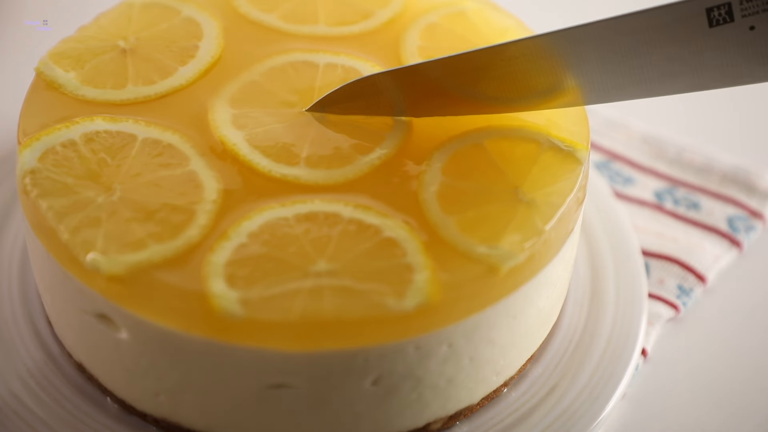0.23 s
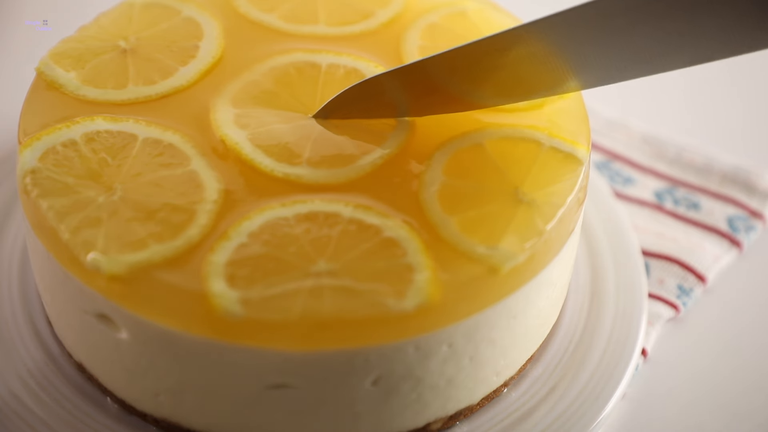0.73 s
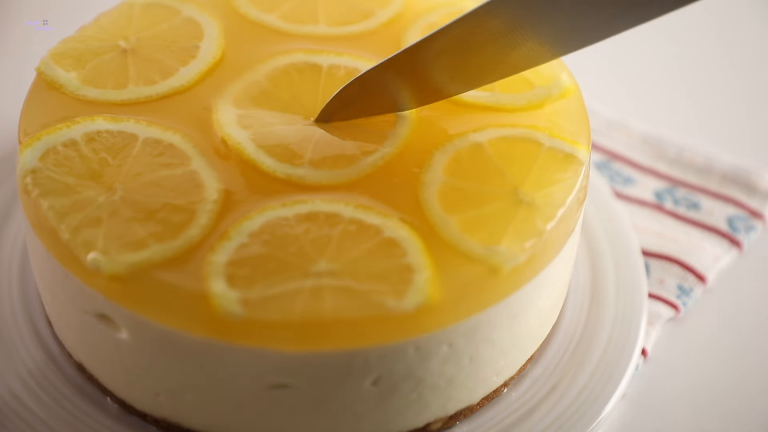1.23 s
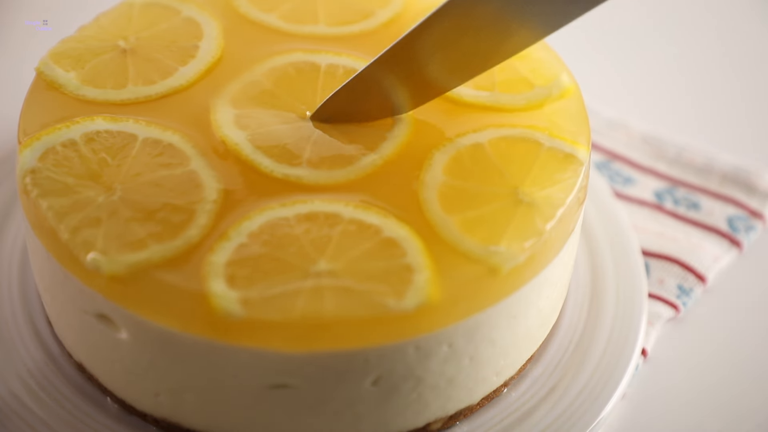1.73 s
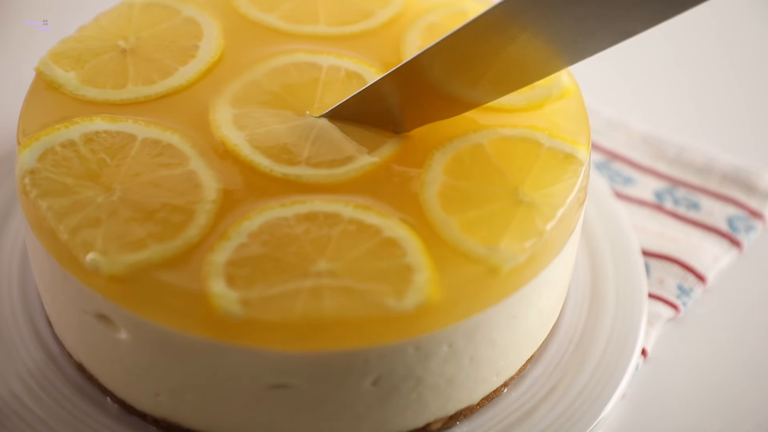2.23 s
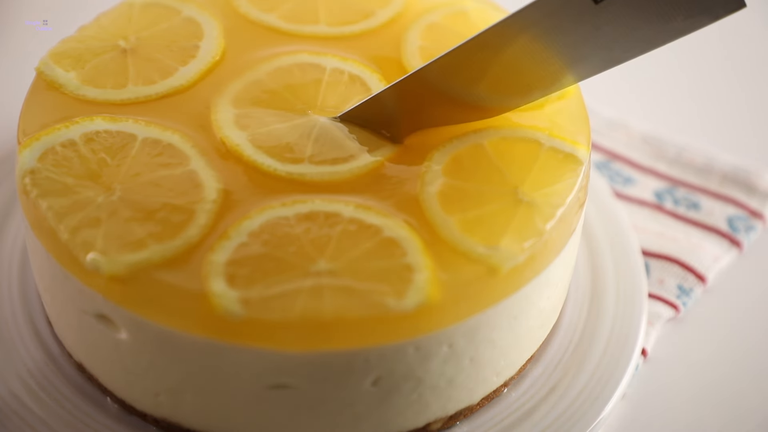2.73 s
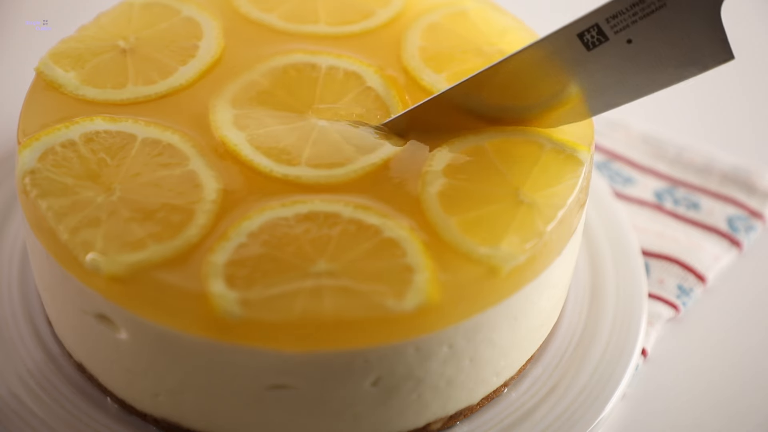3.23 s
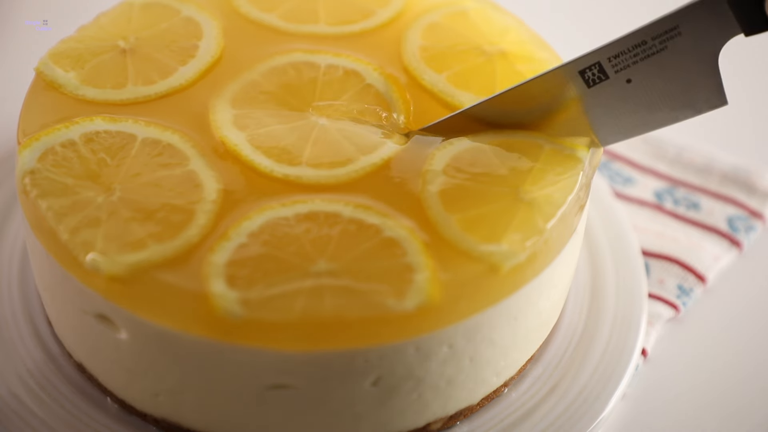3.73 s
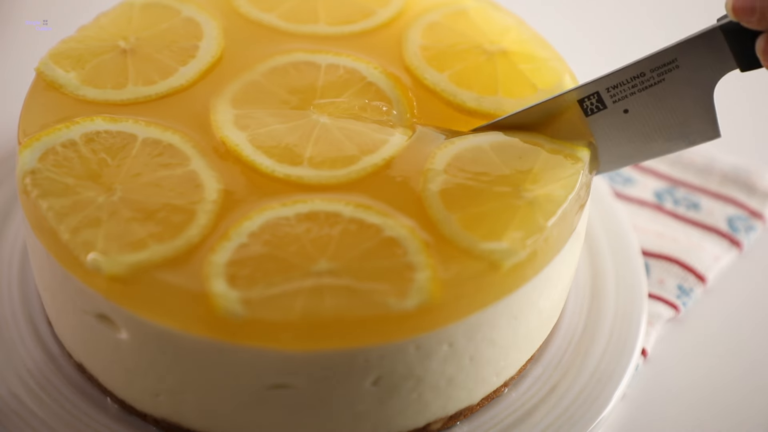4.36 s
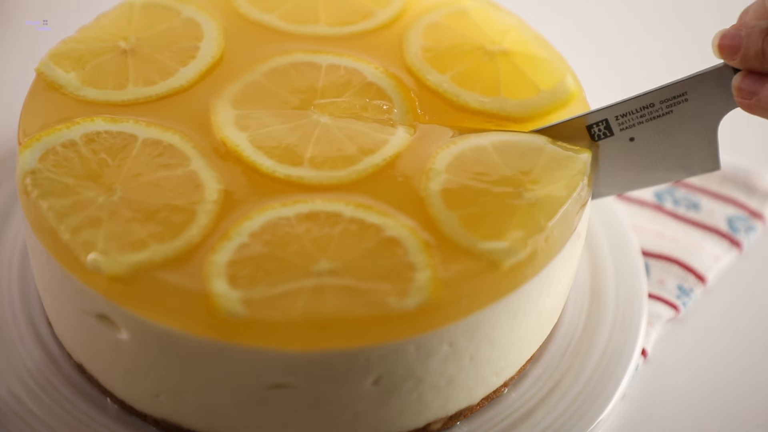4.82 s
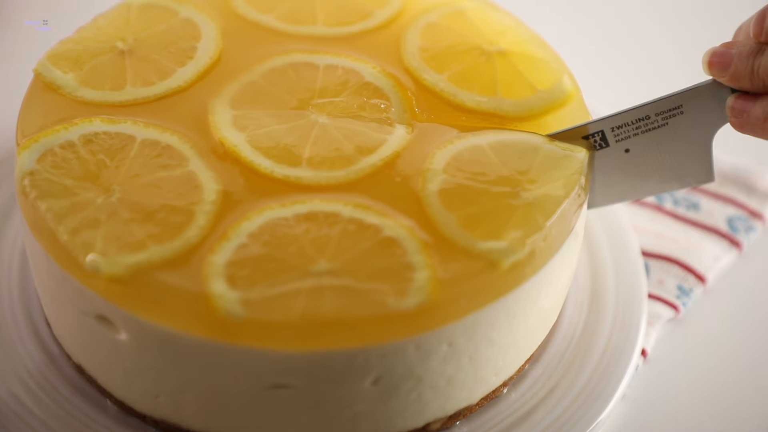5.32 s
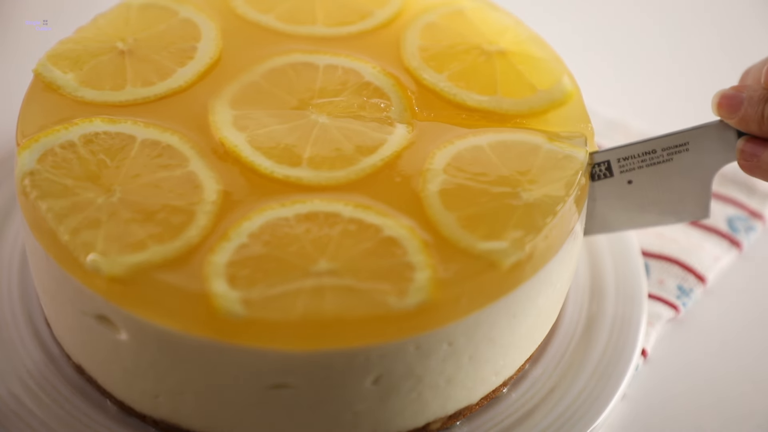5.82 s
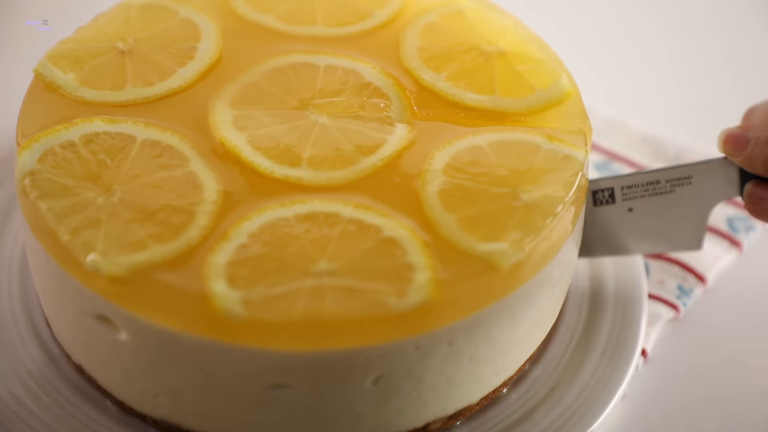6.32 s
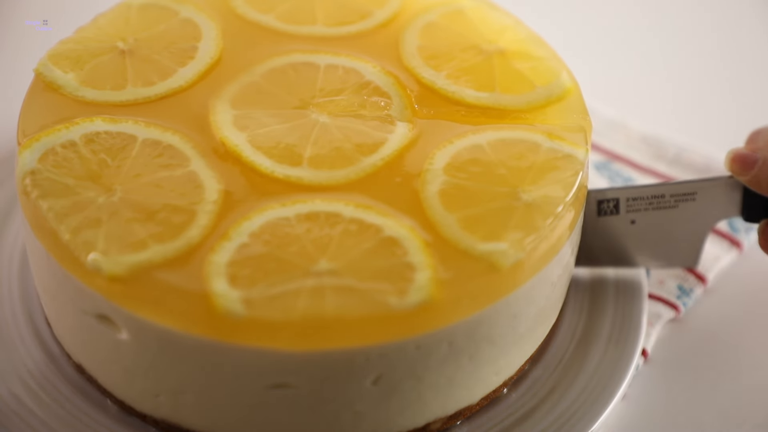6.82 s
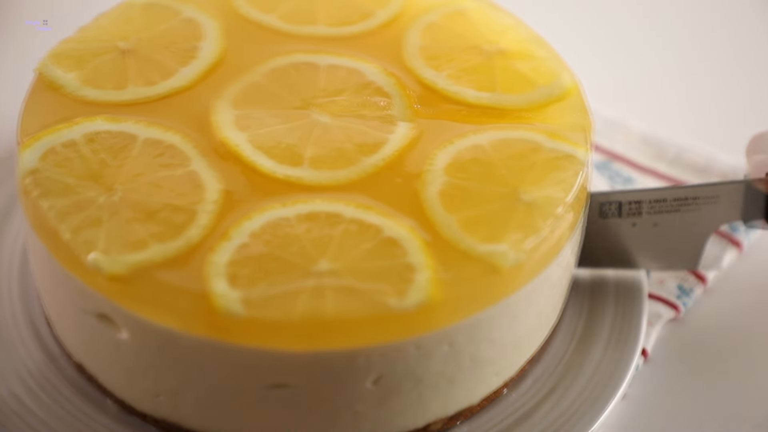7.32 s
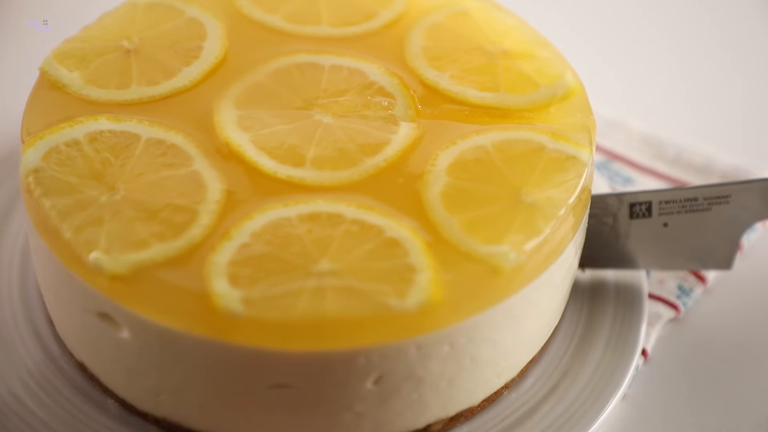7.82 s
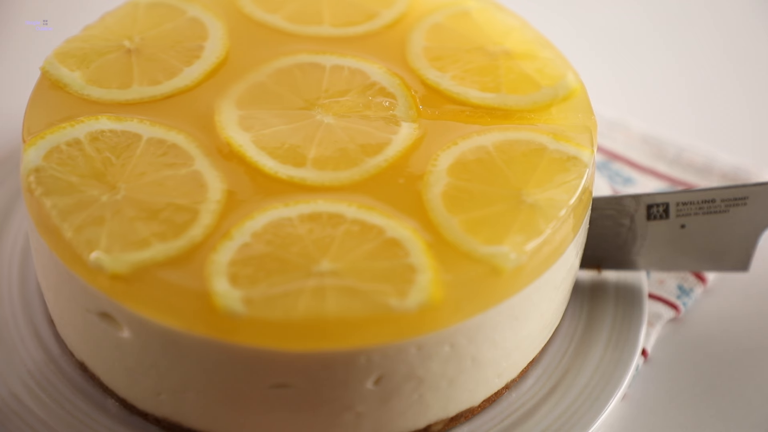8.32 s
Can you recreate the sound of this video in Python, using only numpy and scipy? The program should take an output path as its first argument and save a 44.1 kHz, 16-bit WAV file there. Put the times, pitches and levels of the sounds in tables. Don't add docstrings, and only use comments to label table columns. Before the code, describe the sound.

A cake is cut slowly, heard from close by in a small room. At first there is only hiss, faint rumble and isolated ticks; three quick fibrous tears follow, then another, each with a dull thud. Light jelly pops lead to crisp biscuit crunching that builds to a hard, very loud crack on the plate. Steel scrapes stutter over glaze, a hum dies, and filling peels softly away.

```python
import sys
import numpy as np
from scipy import signal
from scipy.fft import rfft, irfft, next_fast_len
from scipy.io import wavfile

SR = 44100
rng = np.random.default_rng(int(sys.argv[2]) if len(sys.argv) > 2 else 0)


def invert_db(x):
    u = np.asarray(x, float) / 20
    return 10 ** u


def int16_out(signal):
    q = np.round(np.clip(np.atleast_2d(signal).T, -1, 1) * 32767)
    wavfile.write(sys.argv[1], SR, q.astype(np.int16))


N = 378378


def unit(x):
    return x / np.sqrt(np.mean(x ** 2) + 1e-20)


def along(points, hz):
    f, v = np.transpose(points)
    return np.interp(np.log(hz + 1), np.log(f + 1), v)


def curves(rows):
    s, *cols = np.transpose(rows)
    t = np.arange(N) / SR
    gate = np.clip(np.minimum(t - s[0], s[-1] - t) * 20, 0, 1)
    return [np.interp(t, s, c) for c in cols] + [gate]


def swells(rows):
    t = np.arange(N) / SR
    total = 0
    for s, length, *db in rows:
        bump = np.cos(np.pi * np.clip((t - s) / length, -.5, .5)) ** 2
        total = total + invert_db(db)[:, None] * bump
    return total


def held(db, hold_s):
    keep = np.exp(-1 / (hold_s * SR))
    return np.sqrt(signal.lfilter([1 - keep], [1, -keep], invert_db(2 * db)))


def wobble(rate):
    knots = rng.standard_normal(int(N * rate / SR) + 2)
    return np.interp(np.arange(N) * rate / SR, np.arange(len(knots)), knots)


def filtered(x, response):
    m = next_fast_len(N + SR // 2)
    return irfft(rfft(x, m) * response(np.fft.rfftfreq(m, 1 / SR)), m)[:N]


def body(modes):
    def response(f):
        total = 0
        for k, (c, w, db) in enumerate(modes):
            total = total + (-1) ** k * invert_db(db) * 1j * f * w / (c * c - f * f + 1j * f * w)
        return total
    return response


def noise(spectrum):
    return unit(filtered(rng.standard_normal(N), lambda hz: invert_db(along(spectrum, hz))))


def grains(s, hz, size, cycles):
    k = np.arange(64)
    turns = np.clip(hz, 500, .3 * SR)[:, None] * k / SR
    life = turns / np.clip(cycles, .2, 3)[:, None]
    waves = size[:, None] * (life * np.exp(1 - life)) ** 2 * np.cos(2 * np.pi * turns)
    at = np.round(s * SR).astype(int)[:, None] + k
    return np.bincount(at.ravel(), waves.ravel(), N + SR)[:N]


def crumbs(count, spread_db):
    draw = rng.random((count, 3))
    size = invert_db(-spread_db * np.log(draw[:, 1] + 0.00058)) * np.sign(draw[:, 2] - .5)
    return unit(np.bincount((draw[:, 0] * N).astype(int), size, N))


# centre in Hz, width in Hz, level in dB
DISH = [(338, 170, -1.5), (538.7, 263, 1.5), (697, 172, 2.5), (1430, 1300, -16.5)]


def knocks(s, db, modes=DISH):
    return filtered(np.bincount(np.round(s * SR).astype(int), invert_db(db), N), body(modes))


def breaks(rows):
    s, db, hz, knock, edge = np.transpose(rows)
    cycles = np.full(len(s), 0.78)
    clicks = grains(s, hz, invert_db(db + 0.5), 0.89 * cycles)
    edges = grains(s, np.full(len(s), 8370), invert_db(db + edge + 14.5), 1.24 * cycles)
    return clicks + edges + knocks(s, db + knock + 38.5)


def clumps(rows, edge_db, count=12):
    s, db, hz, knock, ms = (c[:, None] for c in np.transpose(rows))
    blur_db = -1.5 * ms
    draw = rng.standard_normal((len(s), count, 3))
    lesser = np.arange(count) > 0
    when = s - 1 / hz + lesser * ms / 1000 * .36 * draw[..., 0]
    pitch = hz * np.exp(0.3654 * lesser * draw[..., 1])
    small = 0.858 * np.tanh(invert_db(-10) * np.sqrt(np.abs(ms)) * draw[..., 2])
    size = invert_db(db - 2.5) * np.where(lesser, small, invert_db(1.0 + .5 * blur_db))
    clicks = grains(when.ravel(), pitch.ravel(), size.ravel(), np.full(when.size, 0.96))
    edge_size = invert_db(db + edge_db + 2 * blur_db + 0.5).ravel()
    edge = grains(s.ravel(), np.full(len(s), 9150), edge_size, np.full(len(s), 1.5))
    return clicks + edge + knocks(s.ravel(), (db + knock + 30).ravel())


# frequency in Hz, level in dB per Hz
HISS = [(110, -42), (180, -7), (287, 1), (359, -4.5), (432, -0.5), (729, -5.5), (785, -5), (1370, -4),
        (2690, -6), (8380, -3.5), (15500, -12)]
RUMBLE = [(15, -35), (30, -12.5), (42, -2.5), (60, -12), (200, -17.5), (280, -42)]
# time in seconds, level in dB
HOUSE = [(0, -62), (.8, -61.5), (1.55, -56), (1.7, -59), (2.4, -61.5), (3.5, -61), (4.8, -63.5), (7, -63),
         (7.6, -66.5), (8.58, -64)]
# middle in seconds, length in seconds, lower and upper mode in dB
HAND = [(2.45, 0.15, -56, -71.5), (3.4, 0.26, -55.5, -84), (3.81, 0.099, -82.5, -69.5),
        (4.15, 0.36, -70, -68), (5.09, 0.6, -54.5, -56.5), (5.55, 0.36, -46, -46), (5.72, 0.35, -44, -53),
        (5.97, 0.23, -75, -45), (6.15, 0.643, -48, -53), (6.37, 0.26, -39.5, -26), (6.56, 0.28, -48, -55),
        (6.67, 0.143, -62, -46.5)]
# centre in Hz, width in Hz, level in dB
SWAY = [(89.6, 19.8, 0), (139.5, 44, 0)]
LEAN = [(80.4, 55, 0), (127.5, 13, 0)]


def quiet():
    sway_db, _ = curves(HOUSE)
    lean_lower, lean_upper = swells(HAND)
    modes = []
    for mode in SWAY + LEAN:
        modes.append(unit(filtered(rng.standard_normal(N), lambda hz: body([mode])(hz) ** 2)))
    lower, upper, low_lean, high_lean = modes
    sway = invert_db(sway_db + 1.3 + 2.0 * wobble(6)) * lower
    sway += invert_db(sway_db - 7 + 1.9 * wobble(2.49)) * upper
    sway += lean_lower * low_lean + lean_upper * high_lean
    rumble = invert_db(-72.5 + 4.0 + 0.43 * (sway_db - sway_db.mean()) + 4.3 * wobble(5.0))
    rumble += invert_db(-11) * lean_lower
    hiss = invert_db(-56 + 0.077 * wobble(2.4)) * noise(HISS)
    return hiss + rumble * noise(RUMBLE) + sway


# start in seconds, peak in dB, pitch in Hz, width in Hz
RINGS = [(0.118, -47.5, 575, 115), (1.002, -47, 620, 130), (6.5938, -30.5, 4490, 84),
         (4.741, -47, 650, 300), (4.838, -37, 620, 250), (4.838, -46.5, 1850, 300), (4.862, -41, 650, 250),
         (4.862, -42, 1900, 350), (5.04, -36, 800, 270), (5.165, -36.5, 620, 110), (5.19, -37, 400, 150),
         (5.283, -45, 1880, 200), (5.704, -32, 574, 46), (5.72, -43.5, 290, 11), (6.16, -35.5, 280, 25),
         (6.2285, -12, 290, 170), (6.27, -26, 620, 250), (6.375, -15, 240, 200), (7.711, -41, 600, 200),
         (8.058, -43, 450, 130), (8.398, -48.5, 2620, 140), (8.398, -50.5, 6700, 150),
         (8.4795, -47, 4000, 150), (8.4934, -48, 6700, 150)]


def rings():
    out, t = np.zeros(N + SR), np.arange(SR // 8) / SR
    for s, db, hz, width in RINGS:
        decay = np.exp(-np.pi * width * t) * (1 - np.exp(-t * hz))
        out[round(s * SR):][:len(t)] += invert_db(db + 6.5) * np.sin(2 * np.pi * hz * t) * decay
    return out[:N]


# start in seconds, peak in dB, pitch in Hz
POPS = [
    (0.8876, -29, 6000),
    (3.9456, -21, 6100),
    (4.0551, -25.5, 5180),
]


def pops():
    s, db, hz = np.transpose(POPS)
    return grains(s, hz, invert_db(db), np.full(len(s), 1.97))


# start in seconds, peak in dB, pitch in Hz, knock in dB, edge in dB
SNAPS = [(0.8878, -31.5, 5870, -23, -10), (1.8861, -45, 1970, -6, -14), (1.9044, -24.5, 6200, -17.5, -21),
         (2.796, -36.5, 5820, -24, -4), (2.9255, -34, 5460, -9, -37.5), (2.9694, -40.5, 7210, -17, -19),
         (2.983, -43.5, 2000, -4, -16.5), (3.1106, -17.5, 2550, -8, -22), (3.1135, -11.5, 4300, -30, -19),
         (3.193, -33.5, 11500, -28, -26.5), (3.3294, -39, 1620, -14, -20), (3.6806, -32, 4700, -36.5, -13),
         (3.9455, -32.5, 2510, -12.5, -19), (4.055, -23, 3200, -19, -26)]


def snaps():
    return breaks(SNAPS)


# start in seconds, peak in dB, upper modes in dB
SETTLES = [
    (0.898, -53, -13),
    (3.797, -51, 1.5),
    (8.517, -41, 0),
]
# pitch in Hz, level in dB, decay by 60 dB in seconds
SEAT = [(155.2, 0, 0.191), (342, -1.5, 0.056), (662, 5, 0.0274)]


def settles():
    out, t = np.zeros(N + SR), np.arange(SR // 2) / SR
    for s, db, upper_db in SETTLES:
        for k, (hz, level_db, t60) in enumerate(SEAT):
            gain = invert_db(db + level_db + upper_db * (k > 0) - 60 * t / t60)
            note = np.sin(2 * np.pi * hz * t) * (1 - np.exp(-t / 0.00177))
            out[round(s * SR):][:len(t)] += gain * note
    return out[:N]


# start in seconds, peak in dB
TAPS = [(0.898, -32.5), (1.781, -37), (1.802, -34.5), (3.729, -42), (3.861, -44), (3.969, -49.5),
        (4.087, -39), (4.203, -41.5), (4.291, -40.5), (4.383, -43), (4.671, -51.5), (5.694, -26.5),
        (5.709, -28.5), (6.3556, -5.5), (8.43, -43), (8.481, -42)]


def taps():
    s, db = np.transpose(TAPS)
    return knocks(s, db + 26.5)


# start in seconds, peak in dB, lowest pitch in Hz, knock in dB, length in ms
TEARS = [
    (1.6157, -16.5, 4680, -5, 10.3),
    (1.713, -25, 4370, -3.5, 5),
    (1.8132, -33, 4070, 8, 5.6),
    (3.1071, -16.5, 2230, -17, 5.4),
]
# spread of pitch as a log ratio, lowest fizz in Hz, fizz in dB
JUICE = [(0.99, 4360, -20), (0.85, 4600, -17), (0.88, 4940, -29), (1.28, 2130, -25.5)]
# centre in Hz, width in Hz, level in dB
TIP = [(4660, 90, -5), (7850, 110, -13.5)]
RIND = [(385.6, 215, -2.5), (530, 150, 1), (1100, 360, -16)]


def tears(count):
    s, db, hz, knock, ms = (c[:, None] for c in np.transpose(TEARS))
    scatter, fizz_hz, fizz_db = (c[:, None] for c in np.transpose(JUICE))
    draw = rng.standard_normal((len(s), 9 * count, 4))
    late = np.arange(draw.shape[1]) >= count
    when = s + np.where(late, 0.048 * np.abs(draw[..., 0]), ms / 1000 * (.52 + .25 * draw[..., 0]))
    height = .5 + .5 * np.tanh(0.91 * draw[..., 1])
    coarse = draw[..., 3] > 1.2
    fibre_pitch = hz * np.exp(scatter * height * np.where(coarse, -1, 1))
    pitch = np.where(late, fizz_hz * np.exp(scatter * height), fibre_pitch)
    size_db = db - 16.5 - 4.6 * coarse
    size_db = size_db - 1.74 * ~late * (draw[..., 0] ** 2 - 1)
    size_db = size_db + late * (fizz_db + 9.0 - 140 * (when - s))
    size = invert_db(size_db) * draw[..., 2]
    cycles = np.where(late, 1.5, 2.2) + 0 * when
    fibres = grains(when.ravel(), pitch.ravel(), size.ravel(), cycles.ravel())
    plate = knocks((s + ms * 0.000214).ravel(), (db + knock + 32.5).ravel(), RIND)
    return fibres + filtered(fibres, body(TIP)) + plate


# start in seconds, peak in dB, upper mode in dB
THUDS = [
    (1.618, -29, -6),
    (1.715, -28.5, -7.5),
    (1.815, -39.5, -0.5),
    (3.114, -24.5, -2.5),
]
# pitch in Hz, width in Hz, level in dB (a blow sets its own levels)
TABLE = [(78, 9.07, -1.5), (125.6, 13.2, 3.5)]


def thuds():
    out, t = np.zeros(N + SR), np.arange(SR // 2) / SR
    for s, db, upper_db in THUDS:
        for (hz, width, _), gain_db in zip(TABLE, (0, upper_db)):
            decay = np.exp(-t * width * 2.0) * (1 - np.exp(-t / 0.0107))
            out[round(s * SR):][:len(t)] += invert_db(db + gain_db - 4.0) * np.sin(2 * np.pi * hz * t) * decay
    return out[:N]


# middle in seconds, length in seconds, level in dB
DRAG = [(2.81, 0.326, -54.5), (3.0, 0.108, -54), (3.085, 0.073, -46), (7.362, 0.048, -53),
        (7.44, 0.177, -58.5), (7.54, 0.15, -53.5), (7.73, 0.091, -64.5), (7.95, 0.31, -61)]
# middle in seconds, length in seconds, level in dB
RUBS = [
    (2.8, 0.14, -51),
    (2.845, .07, -62),
]
# centre in Hz, width in Hz, level in dB
RUB = [(390, 170, -1), (753, 190, 2)]


def drag():
    slips = crumbs(count=9000, spread_db=2.2)
    plate = unit(filtered(slips, body(DISH))) * swells(DRAG)[0] * invert_db(-6.0)
    return plate + unit(filtered(slips, body(RUB))) * swells(RUBS)[0]


# time in seconds, pressure in dB
PUSHES = [
    [(4.6, -70.5), (4.9, -67), (4.95, -56.5), (5.02, -55.5), (5.075, -44), (5.09, -51), (5.105, -46),
     (5.13, -57), (5.158, -46)],
    [(5.19, -63.5), (5.225, -56.5), (5.3, -56), (5.4, -50.5), (5.468, -48), (5.5, -48), (5.6, -52),
     (5.62, -52), (5.672, -61)],
    [(5.688, -64), (5.694, -42.5), (5.714, -42.5), (5.75, -46), (5.765, -48), (5.79, -53.5), (5.854, -63)],
    [(5.885, -60), (5.91, -57.5), (5.97, -58), (5.995, -49.5), (6.022, -57.5), (6.04, -45.5), (6.095, -52),
     (6.115, -57.5), (6.15, -50.5)],
    [(6.175, -40.5), (6.19, -44.5), (6.21, -41.5), (6.23, -43), (6.25, -43), (6.262, -43.5)],
    [(6.268, -35), (6.285, -32), (6.31, -23), (6.34, -20.5), (6.346, -17.5), (6.357, -14)],
    [(6.361, -34), (6.395, -40.5), (6.425, -37), (6.455, -39), (6.462, -41), (6.469, -36), (6.476, -52),
     (6.5, -52)],
    [(6.516, -36), (6.54, -34), (6.575, -52), (6.645, -51.5), (6.678, -70), (6.704, -53), (6.74, -91),
     (6.81, -56.5), (6.84, -65)],
]
# plate in dB, blade in dB
GRIP = [(0.5, -6.5), (0, -12), (-2, -12), (1.5, -4), (4.5, -2), (0, -3), (0.5, 0), (-1, -0.5)]
# frequency in Hz, level in dB per Hz
CRUMB = [(590, -35), (1000, -3), (1120, -7.5), (1260, 17), (1730, -8), (4920, -6.5), (6000, -3.5),
         (8900, -3), (10500, -17), (15500, -47)]
# centre in Hz, width in Hz, level in dB
BLADE = [
    [(1760, 270, 5), (2620, 170, -2.5), (3950, 72, 6)],
    [(1214, 80, 1.5), (1990, 560, -0.5), (2880, 1700, -6), (4300, 455, 1)],
]
PLATE = [
    [(248, 130, -4.5), (537, 203, 1.6), (743.7, 266, 0), (1090, 460, -8)],
    [(280, 174, -2), (521, 141, 1.5), (770, 310, -1.5), (1040, 340, -12)],
]
THROUGH_S = 5.85


def crush():
    pressure_db, gate = curves([row for push in PUSHES for row in push])
    t = np.arange(N) / SR
    push = np.searchsorted([rows[-1][0] for rows in PUSHES[:-1]], t)
    middle_db = -30.5
    plate_db, blade_db = np.array(GRIP)[push].T + middle_db
    over_db = pressure_db - middle_db
    fractures = unit(crumbs(count=60000, spread_db=3.0) * invert_db(1.7 * wobble(60) + 3.4 * wobble(280)))
    force = (1.6 * fractures + rng.standard_normal(N)) * invert_db(1.33 * wobble(70))
    crackle = unit(filtered(fractures, lambda hz: invert_db(along(CRUMB, hz)) / (1 + (2300 / (hz + 1)) ** 4)))
    down = t > THROUGH_S
    blade_up, blade_down = (unit(filtered(force, body(modes))) for modes in BLADE)
    plate_up, plate_down = (unit(filtered(force, lambda hz: body(modes)(hz) ** 2)) for modes in PLATE)
    blade = held(blade_db + 0.82 * over_db, hold_s=0.003) * np.where(down, blade_down, blade_up)
    plate = held(plate_db + 0.89 * over_db, hold_s=0.0033) * np.where(down, plate_down, plate_up)
    return gate * (invert_db(pressure_db) * crackle + blade + plate)


# start in seconds, peak in dB, pitch in Hz, knock in dB, length in ms
CRACKS = [(4.7403, -34, 5800, -20, 1.7), (4.9386, -36, 5900, -9, 1.93), (5.0136, -41, 6680, -15.1, 1.9),
          (5.025, -30, 5800, -20, 1.4), (5.0512, -42, 5380, -15.7, 2.0), (5.0988, -30, 5880, -9.3, 3.6),
          (5.1379, -30, 6100, -18.0, 2.1), (5.2276, -32, 4850, -21.0, 2.2), (5.2603, -39, 5700, -15.5, 1.3),
          (5.2807, -37, 3340, 5, 3.5), (5.3376, -33, 5300, -9, 2.9), (5.3554, -33, 6770, -16, 1.3),
          (5.3655, -30, 7210, -21, 1.4), (5.3693, -36, 6950, -18.5, 1.03), (5.384, -30.8, 7240, -16.5, 1.9),
          (5.4218, -35, 6620, -16.6, 1.3), (5.4254, -31.4, 7300, -13.4, 1.47),
          (5.4388, -26.2, 7970, -17.2, 0.83), (5.4598, -24.5, 6550, -13, 1.7),
          (5.4698, -23.5, 6960, -25.5, 1.4), (5.5103, -21, 7000, -14, 1.35),
          (5.5424, -35, 6730, -12.6, 1.1), (5.5477, -31.6, 6660, -14, 1.8), (5.5555, -33, 5830, -8.7, 1.4),
          (5.5598, -17, 7230, -17, 1.76), (5.5757, -28, 7400, -19, 1.03), (5.588, -22, 6800, -17, 1.6),
          (5.6023, -28, 7050, -14, 1.26), (5.6075, -31, 7150, -18.5, 1.2), (5.6773, -30.5, 6100, -16.5, 1),
          (5.6923, -11, 7160, -14.5, 1.8), (5.7059, -15, 5200, -28, 1.5), (5.718, -22, 7810, -11, 1.8),
          (5.7263, -32, 6080, -9, 1.17), (5.7339, -25.4, 7290, -15, 1.2), (5.7443, -28, 7100, -13.0, 1.2),
          (5.761, -30.2, 6240, -5, 2.6), (5.7715, -35, 5800, -17, 4.5), (5.8195, -35, 7000, -13.8, 1.12),
          (5.8793, -21, 9020, -26.1, 1.55)]


def cracks():
    return clumps(CRACKS, edge_db=-10)


# start in seconds, peak in dB, pitch in Hz, knock in dB, length in ms
SPLITS = [(5.958, -35, 7400, -7, 1.6), (5.974, -35.5, 3600, 2, 2), (5.9881, -28.5, 7860, -17.8, 0.89),
          (6.0057, -36.5, 2870, -0.5, 0.67), (6.0376, -35, 4740, -16, 3.4), (6.0533, -32, 4840, -11, 1.8),
          (6.0711, -36, 4400, -16.5, 1.18), (6.0784, -38, 4760, -13.5, 2.6), (6.106, -41, 3440, -8.6, 1.1),
          (6.12, -36, 7260, -2, 0.98), (6.1249, -36, 4780, 3, 2.1), (6.1341, -29, 4090, -14.2, 1.5),
          (6.146, -27, 5000, -16, 1.4), (6.1485, -32, 5940, -16.5, 0.92), (6.1616, -39, 2500, -2, 2.5),
          (6.168, -31, 3840, -4, 0.82), (6.1735, -28, 7400, -9, 1.58), (6.1742, -38.5, 5370, -7, 1.1),
          (6.1868, -39, 5200, -10.5, 1.7), (6.2061, -26, 6730, -3, 2.15), (6.214, -20, 4330, -16, 2),
          (6.227, -24, 6520, 0.5, 2.3), (6.2397, -30, 5110, -11, 1.76), (6.2435, -30, 5530, -11, 3),
          (6.254, -22.5, 5550, -12, 2.2), (6.267, -11, 6170, -7, 1.02), (6.2714, -19, 6400, -11.5, 3.3),
          (6.2868, -17, 5090, -4.5, 1.5), (6.296, -10.5, 4670, -5, 3.1), (6.3025, -9, 7600, -12, 2.5),
          (6.3104, -4.5, 7400, -16, 2.7), (6.317, -2, 6686, -22, 1.8), (6.329, -2, 5560, -10, 2.7),
          (6.3398, -7, 5800, -12, 0.91), (6.344, 3, 7610, -17, 1.2), (6.3455, -26, 6760, -33.5, 1.2),
          (6.3545, -1, 6990, -32, 1.2), (6.357, 0.5, 8130, -22, 2.4), (6.3702, -13, 4300, -12, 1.9),
          (6.3847, -16.5, 4360, 1, 0.82)]


def splits():
    return clumps(SPLITS, edge_db=-10)


# start in seconds, peak in dB, pitch in Hz, knock in dB, length in ms
SLIPS = [(6.4027, -28, 4700, -2, 1.4), (6.4153, -21.5, 3480, -8, 4.5), (6.4255, -12.5, 6800, -7.5, 5.5),
         (6.436, -16, 4410, -3, 2.8), (6.4385, -27, 4500, -13, 1.07), (6.4439, -26, 3430, 2, 0.7),
         (6.4472, -28, 5200, -12.6, 1.6), (6.4502, -18, 4870, -13, 6.7), (6.4589, -23.5, 4150, -4, 1.35),
         (6.468, -27, 8240, -11, 6.6), (6.4858, -27.5, 4570, -8, 1.3), (6.4922, -31, 5870, -17, 1.4),
         (6.4994, -34, 5260, -10, 0.87), (6.5053, -29, 4240, -15, 1.5), (6.5091, -19.5, 4570, -9, 4.03),
         (6.5165, -17.5, 4340, -13, 0.8), (6.5268, -24, 6100, -8.5, 3.9), (6.5319, -20, 4830, -7, 0.67),
         (6.5366, -11.5, 5400, -4.5, 2.42), (6.5496, -29, 6000, -14, 1.8), (6.5574, -11, 5730, -20, 1.24),
         (6.5692, -19, 5700, -18, 1.83), (6.5872, -15, 7350, -32, 1.14), (6.5938, -21, 5350, -21.3, 3.5),
         (6.6133, -26, 4900, -15, 3.0), (6.6239, -29.4, 3930, -17.9, 2.5), (6.6336, -18, 5000, -12.5, 4.3),
         (6.7013, -36.3, 4380, -7, 2.6), (6.706, -34, 5010, -12.3, 4.1), (6.8228, -32, 4500, -13, 5.74)]
# centre in Hz, width in Hz, level in dB
STEEL = [(1525, 20, -7), (2750, 77, -11.5), (4480, 73.5, -1), (7100, 300, -12), (9230, 100, -11.5)]


def glaze_slips():
    slips = clumps(SLIPS, edge_db=-2.5)
    return slips + invert_db(-6) * filtered(slips, body(STEEL))


# start in seconds, peak in dB
SKIDS = [
    (6.534, -28),
    (6.557, -31),
    (6.569, -33),
    (6.593, -28),
    (6.6111, -25.5),
    (6.624, -36.5),
    (6.6308, -26),
    (6.64, -30.5),
    (6.7, -45.5),
]
# middle in seconds, length in seconds, level in dB
SLIDE = [(6.6, 0.12, -35)]
# centre in Hz, width in Hz, level in dB
HUM = [
    (1420, 154, -4.5),
    (1223, 110, 2),
]


def skid():
    t, rub = np.arange(N) / SR, rng.standard_normal(N)
    drive = swells(SLIDE)[0]
    for s, db in SKIDS:
        drive = drive + invert_db(db + 17.5 - 60 * np.abs(t - s) / 0.034) * (t > s)
    hum_s, rise_s, hum_t60 = 6.644, 0.035, 0.31
    hum = invert_db(-45 - 60 * np.abs(t - hum_s) / hum_t60) * np.clip(1 + (t - hum_s) / rise_s, 0, 1)
    settle = np.clip((t - 6.64) / 0.1, 0, 1)
    high, low = (invert_db(mode[2]) * unit(filtered(rub, body([mode]))) for mode in HUM)
    return filtered(drive * rub, body(STEEL)) + hum * ((1 - settle) * high + settle * low)


# start in seconds, peak in dB, pitch in Hz, knock in dB, edge in dB
PEELS = [(7.354, -31, 3500, -16, -12), (7.494, -46, 8500, -30, -9), (7.5077, -41, 4630, -12, -25),
         (7.5137, -43, 4700, -14, -20), (7.531, -46, 7500, -15, -12), (7.5398, -35, 6520, -22, -15),
         (7.5433, -36, 7000, -25, -13), (7.5467, -38, 7100, -32.5, -13), (7.5989, -32.5, 7200, -27, -10.5),
         (7.7064, -40.5, 5800, -7, -30), (7.7155, -41, 5210, -3.5, -32), (7.768, -34.5, 6070, -12, -27),
         (7.955, -28.5, 5500, -33, -37), (8.2059, -33, 5370, -25.5, -23), (8.398, -47, 2720, -22.5, -20),
         (8.4784, -27, 7040, -34, -11.5), (8.4934, -39, 6680, -24, -20)]


def peels():
    return breaks(PEELS)


# delay in ms, level in dB
WALLS = [
    (2.2, -20.5),
    (3.7, -23.5),
    (7.9, -19),
]
# frequency in Hz, decay by 60 dB in seconds
ROOM = [(300, 0.3), (2000, 0.13), (6000, 0.08), (14000, 0.034)]


def room(x):
    out, step = np.zeros(N + SR), SR // 2
    for ms, db in WALLS:
        out[round(ms * SR / 1000):][:N] += invert_db(db) * x
    hz, t, z = signal.stft(rng.standard_normal((N // step + 1, 12000)), SR, nperseg=256)
    tails = signal.istft(z * invert_db(-60 * t / along(ROOM, hz)[:, None]), SR, nperseg=256)[1]
    for at, tail in zip(range(0, N, step), tails):
        wet = signal.fftconvolve(x[at:at + step], tail / np.linalg.norm(tail))
        out[at + 200:][:len(wet)] += invert_db(-13.5) * wet
    return out[:N]


def scene():
    fruit = pops() + snaps() + tears(count=150) + peels()
    fruit = filtered(fruit, lambda hz: 1 / (1 + 0.076 * (hz / 11300) ** 4))
    base = crush() + cracks() + splits() + glaze_slips() + skid()
    base = filtered(base, lambda hz: 1 / (1 + (hz / 11600) ** 16))
    knife = rings() + fruit + taps() + drag() + base
    return (knife + room(knife) + settles() + thuds() + quiet())[None]


def band_limit(x):
    return signal.sosfilt(signal.butter(12, 15660, fs=SR, output="sos"), x)


def record(dry):
    mix = dry / (1 + np.abs(dry) ** 6) ** (1 / 6)
    return band_limit(mix)


dry = scene()
out = record(dry)
int16_out(out)
```